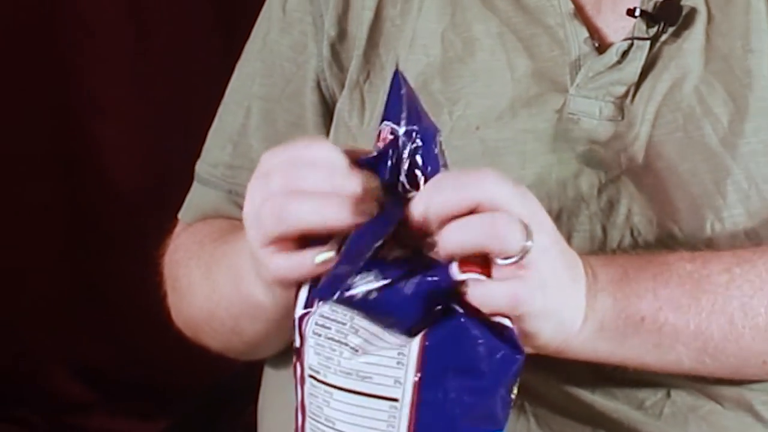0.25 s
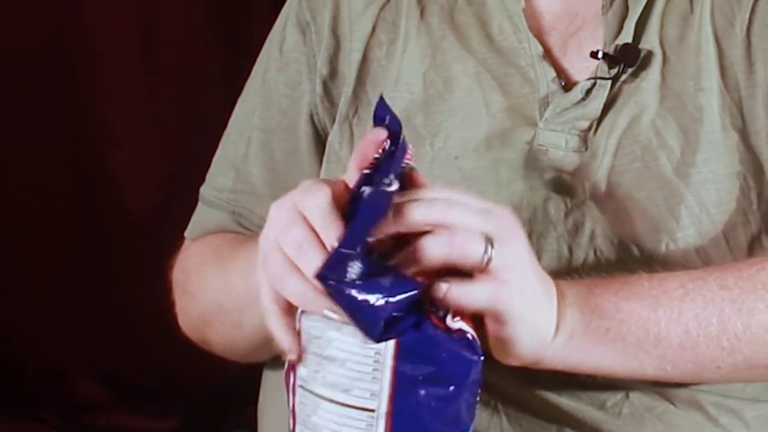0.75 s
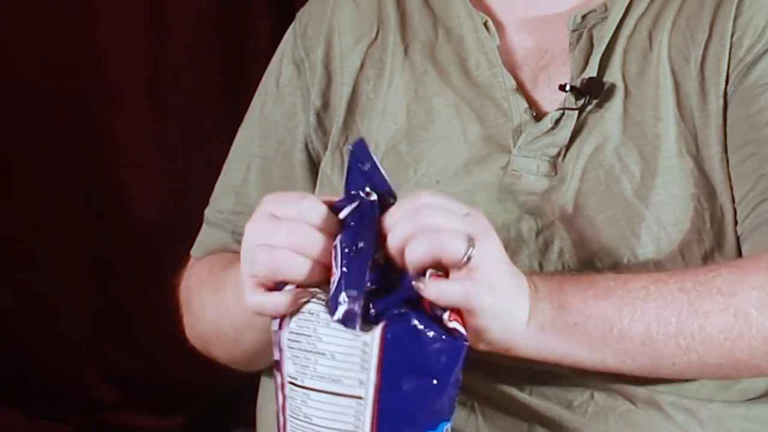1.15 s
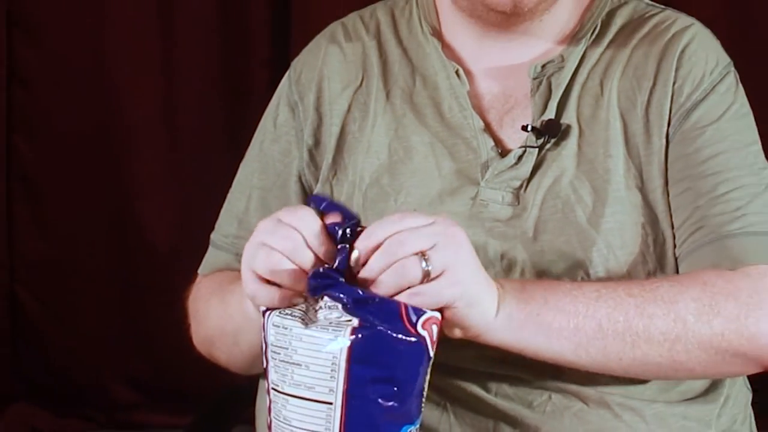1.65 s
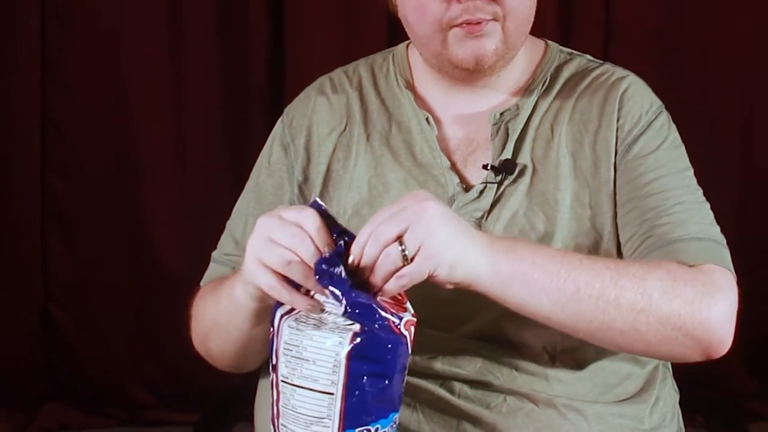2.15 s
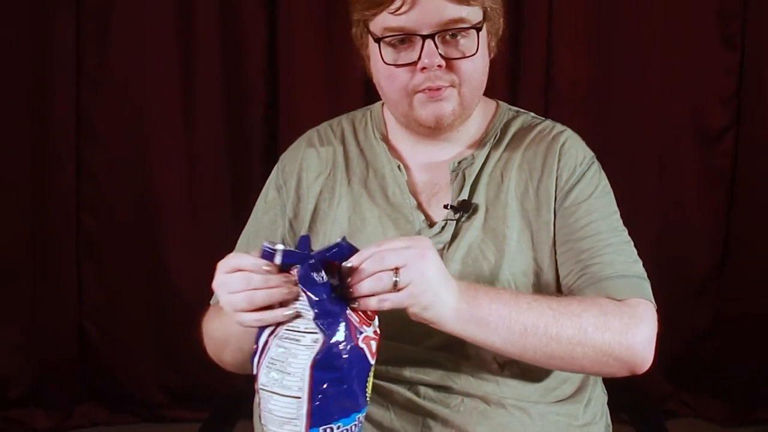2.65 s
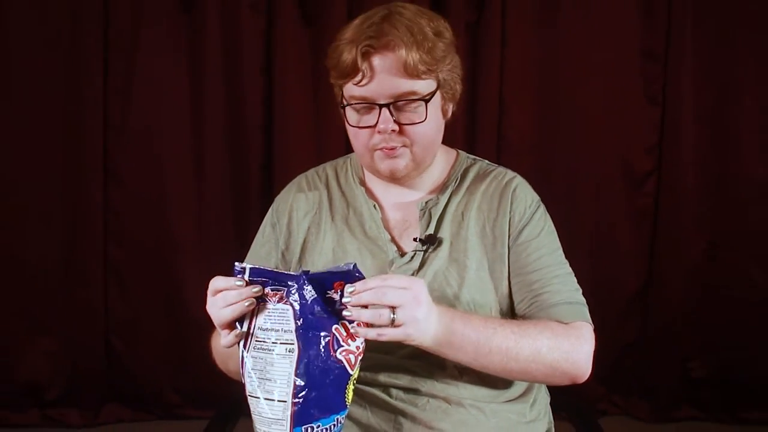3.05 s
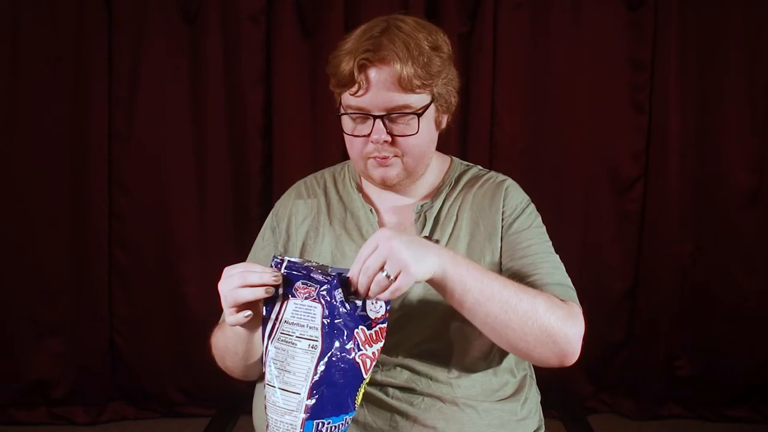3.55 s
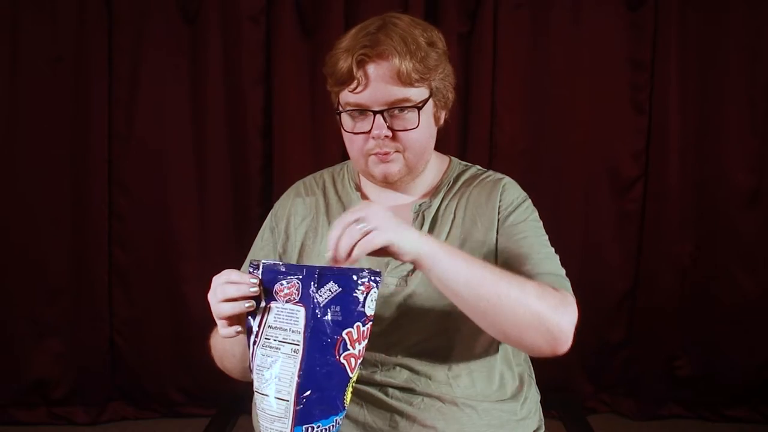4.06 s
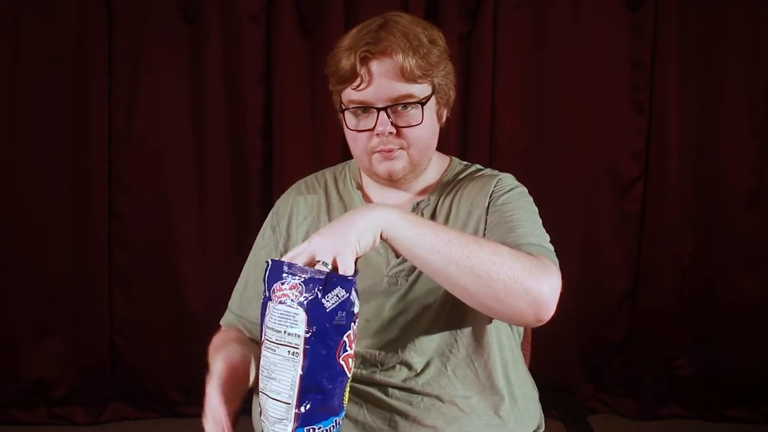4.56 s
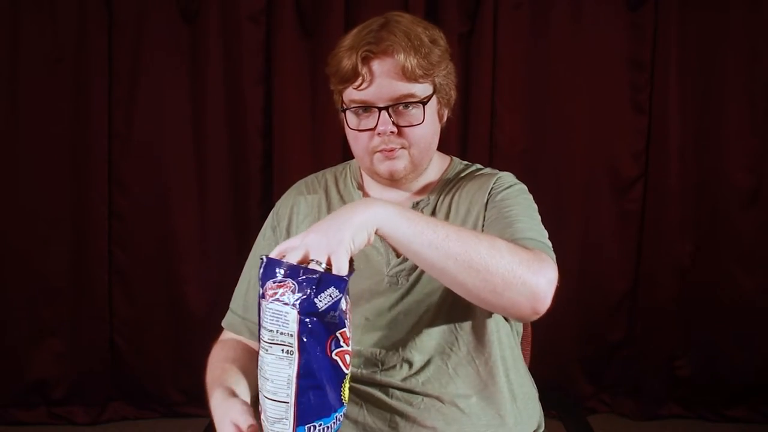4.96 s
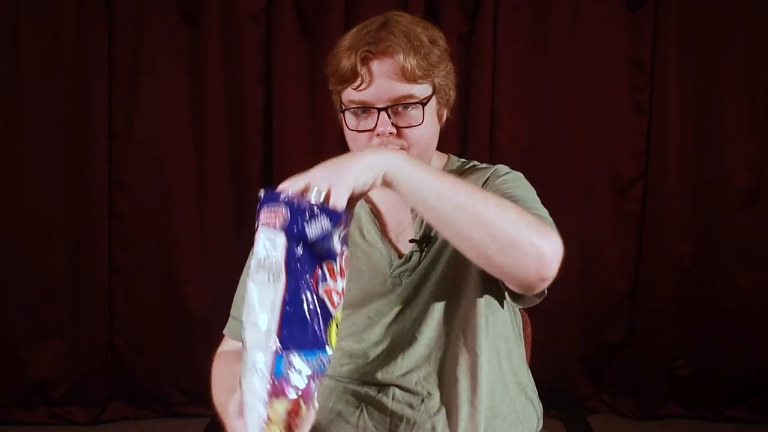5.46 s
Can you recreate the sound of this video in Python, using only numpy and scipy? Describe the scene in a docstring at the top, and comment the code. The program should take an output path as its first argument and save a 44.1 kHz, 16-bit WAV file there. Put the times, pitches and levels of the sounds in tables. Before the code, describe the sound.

Fingers work at a sealed foil snack bag, close to a clip-on microphone in a small curtained room. Dense bright crackle, sharp snaps and small hollow pops run for about three seconds, with two very brief seam zips. It thins to near quiet, crinkles briefly, then bursts crisply as a hand reaches in, ending in faint rustles.

```python
"""A small, curtained room, with a clip-on microphone close to hands that work a foil snack bag open.
Creases snap as ringing film modes over a fine crackle of many small buckles; folds roll as gliding notes.
Whole panels flip with a hollow pop, and the glued seam peels in two quick zips of tiny slips.
Then a hand reaches into the open bag, sliding as soft hiss, rustles it and lifts it, over a faint hush."""
import sys
import numpy as np
from scipy import signal
from scipy.io import wavfile
from scipy.ndimage import uniform_filter1d

SR = 44100
rng = np.random.default_rng(int(sys.argv[2]) if len(sys.argv) > 2 else 0)


def wav_record(signal):
    """Record a signal, one row per channel, as 16-bit PCM in the file named by sys.argv[1]."""
    frames = np.transpose(np.atleast_2d(signal))
    bounded = np.clip(frames, -1, 1)
    # unit amplitude maps onto the largest positive 16-bit level
    quanta = np.round(bounded * 32767).astype(np.int16)
    wavfile.write(sys.argv[1], SR, quanta)


N = 251243
TIME = np.arange(N) / SR  # seconds
EDGE_HZ = 16050  # top of the recorded band

# colour of the bag, as a relative spectrum: frequency_hz, density_db (per Hz)
BAG = [(40, -10), (176, -4.5), (520, -4), (900, -5.5), (1240, -10), (1950, 0.5), (2900, -9), (4500, -14.5),
       (5700, -6.5), (8340, -8.5), (13800, -14.5), (16000, -12.5)]


def snaps(rise=1.0, slip_db=-16, slip_s=0.003, late_s=0.0008, count=3):
    """Each crease buckles and rings its own facet, the broader the drier, amid weaker slips of other facets."""
    # creases that snap through: start_s, energy_db (over one millisecond), pitch_hz,
    # spread_octaves (facet() takes at least 0.2)
    creases = [(0.0665, -24, 2700, 1.1), (0.136, -25, 3720, 0.54), (0.1625, -19.5, 5960, 1.4),
               (0.2019, -17, 2730, 1.66), (0.2248, -18, 2840, 0.31), (0.237, -30, 4600, 0.9),
               (0.3073, -21, 3270, 1.85), (0.4117, -31, 4300, 1.2), (0.438, -25, 1860, 0.28),
               (0.5264, -31.5, 3600, 0.94), (0.5665, -29, 2850, 0.54), (0.599, -24.5, 8140, 0.62),
               (0.614, -22.5, 6550, 1.16), (0.679, -28, 2010, 0.32), (0.739, -28, 5600, 1.4),
               (0.7572, -23, 7100, 1.5), (0.794, -22.5, 5500, 1.15), (0.821, -32, 5850, 0.87),
               (0.8564, -20.5, 7700, 0.53), (0.881, -21, 6200, 0.67), (0.8978, -16, 5600, 1.03),
               (0.987, -24.5, 7900, 0.75), (1.0906, -24, 4350, 1.76), (1.108, -25, 2100, 0.34),
               (1.1164, -22.5, 2170, 0.18), (1.1325, -24, 3800, 0.8), (1.1585, -25.5, 4200, 1.5),
               (1.2008, -26.5, 8700, 0.43), (1.2087, -25.5, 9100, 0.45), (1.225, -25.5, 4560, 1.34),
               (1.238, -21.5, 6550, 1.1), (1.2545, -25.5, 5300, 0.54), (1.288, -26, 4140, 0.36),
               (1.357, -23.5, 3480, 1.05), (1.374, -32, 4120, 1.7), (1.462, -28, 3150, 0.28),
               (1.5022, -30, 2740, 0.79), (1.5198, -28.5, 8300, 0.73), (1.5494, -24, 2210, 0.87),
               (1.6216, -36, 6400, 1.3), (1.6581, -21, 6400, 1.02), (1.666, -23, 5800, 0.75),
               (1.6708, -21.5, 2380, 0.89), (1.7255, -35, 3400, 0.89), (1.847, -25, 6400, 1.1),
               (1.8828, -27.5, 5440, 1.2), (1.8892, -37, 5630, 1.1), (1.945, -25, 6600, 1.4),
               (1.951, -24, 7500, 0.67), (1.9547, -20, 2100, 1.2), (1.9619, -28, 9000, 0.83),
               (1.9658, -22, 9300, 0.66), (2.0674, -18.5, 6170, .12), (2.092, -26.5, 1760, 0.47),
               (2.114, -29, 2840, 0.76), (2.181, -32, 3880, 1), (2.243, -26.5, 2160, 0.92),
               (2.2679, -23.5, 1850, .15), (2.2859, -32.5, 2330, 0.41), (2.3388, -24.5, 2450, 0.82),
               (2.3849, -26, 1950, 0.45), (2.4484, -14, 8360, 0.44), (2.4702, -23, 6700, 0.46),
               (2.4775, -21, 7140, 0.18), (2.483, -24, 3230, 0.21), (2.49, -24, 5040, 0.81),
               (2.5243, -25, 3000, 1.2), (2.5402, -27.5, 5750, 0.8), (2.556, -21.5, 2200, 0.25),
               (2.5694, -12, 2880, 1.14), (2.618, -22.5, 6300, 1.2), (2.662, -32, 4170, 2.5),
               (2.745, -34, 2310, 0.39), (2.758, -23.5, 1780, 0.21), (2.813, -36, 3470, 0.87),
               (2.8765, -21, 9900, 0.19), (2.9001, -17, 9800, 0.41), (2.9181, -20, 7440, 1.7),
               (2.9593, -27, 5000, 0.69), (3.013, -27, 7540, 1.35), (3.152, -39, 8600, 0.64),
               (3.201, -42, 2380, 1), (3.3378, -38.5, 4800, 0.55), (3.603, -52, 2600, 1.1),
               (3.6538, -36, 7060, 0.2), (3.6605, -34, 7160, 0.22), (3.6865, -29.5, 5400, 1.33),
               (3.7835, -17.5, 2500, 0.88), (3.816, -27, 2180, 0.34), (3.861, -33, 1950, 0.29),
               (3.8863, -22, 2000, 1.01), (3.892, -26.5, 1480, 1.07), (3.9889, -29.5, 5170, 0.32),
               (4.016, -42, 4660, 0.34), (4.135, -45.5, 3040, 0.77), (4.38, -36.5, 3100, 0.35),
               (4.398, -23, 5600, 0.64), (4.4086, -29.5, 5600, 0.36), (4.4438, -28, 5100, 0.91),
               (4.4605, -13, 7800, 0.41), (4.4753, -10.5, 7150, 0.48), (4.479, -20, 7000, 0.6),
               (4.5353, -25.5, 6600, 0.4), (4.5604, -27, 2410, 0.17), (4.5809, -23.5, 6500, 0.64),
               (4.6139, -22.5, 5800, 0.42), (4.618, -22, 3840, 0.62), (4.6467, -22, 4960, 0.75),
               (4.6763, -29.5, 4650, 0.54), (4.7, -29.5, 2280, 0.9), (4.816, -32, 3080, 0.68),
               (4.825, -27, 4640, 1.07), (4.8742, -31.5, 2550, 1.83), (4.9245, -35, 6500, 1),
               (4.9443, -28.5, 3350, 1.48), (5.1644, -37, 4450, 0.26), (5.3017, -44.5, 3570, 0.16),
               (5.3745, -29.5, 3350, 0.77), (5.404, -34.5, 2500, 0.49), (5.501, -32, 2000, 1),
               (5.5564, -30, 4900, 0.56), (5.648, -42, 2560, 1.13)]
    t60, linger_db = 0.0105, -26  # t60 in s, before the spread shortens it
    out = np.zeros(N)
    for s, db, hz, octaves in creases:
        ring = facet(hz, octaves, t60 / (1 + octaves / 2), rise, linger_db, crack_db=-13.5)
        add(out, s, amp(db) * rebound(ring, edge=0.37))
        # slips fall just before and after the snap
        for when, detune in rng.uniform(-0.65, 1, (count, 2)):
            slip = facet(hz * 2 ** (detune / 2), octaves, t60, rise, count=12, size=400)
            add(out, s + late_s + slip_s * when, amp(db + slip_db) * slip)
    return out


def facet(hz, octaves, t60, rise, linger_db=-19, crack_db=-12, count=30, size=2400):
    """A patch of film cracks and rings in short modes about its pitch; t60 (s) is at 1 kHz, higher is shorter."""
    t = np.arange(size) / SR
    place, phase = rng.random((2, count, 1))
    octaves = max(octaves, 0.2)
    # one mode at a random place in each equal step of pitch
    low = np.log2(hz) - 2 * octaves
    high = min(np.log2(hz) + 2 * octaves, np.log2(EDGE_HZ))
    f = 2 ** (low + (high - low) * (np.arange(count)[:, None] + place) / count)
    life = t60 * (f / 1000) ** -0.62
    nearness = np.exp(-0.72 * abs(np.log2(f / hz)) / octaves)
    weight = nearness * np.sqrt(amp(read(BAG, f)) * np.sqrt(f))
    fall = np.exp(-np.log(1000) * t / life)
    fall = fall + amp(linger_db) * np.sqrt(np.sqrt(fall))  # the rest of the bag rings on, weaker and longer
    swell = 1 - np.exp(-t * f / rise)  # rise in cycles of each mode
    modes = weight / np.sqrt(life) * swell * fall * np.sin(2 * np.pi * (f * t + phase))
    ring = modes.sum(0) * (1 - t / t[-1])
    # the first few cycles are rough and wide in pitch
    cycles = t * hz
    double_pole = np.poly([np.exp(-2 * np.pi * hz / SR)] * 2)
    rough = signal.lfilter([1, -1], double_pole, rng.standard_normal(size))
    crack = rough * cycles * np.exp(-cycles)
    return one_ms(unit(ring) + amp(crack_db) * unit(crack))


def rebound(ring, edge=0.56, shortest_s=0.00027, longest_s=0.0006):
    """The wave comes back from the edge of the facet and carves the ring into a few separate peaks."""
    trip, side = rng.random(2)
    lag = max(round((shortest_s + (longest_s - shortest_s) * trip) * SR), 1)
    returned = np.r_[np.zeros(lag), ring[:-lag]]
    both = ring + np.sign(side - 0.5) * edge * returned
    return both * np.linalg.norm(ring) / np.linalg.norm(both)  # same energy as before


def crackle(crinkle_gain_db=1.92, fizz_gain_db=-2.5, keen_db=-43, keen_slope=0.19):
    """The buckles sound in the film as crinkle and fizz, and in the pouch as a hollow rumple and bass."""
    # the mouth of the bag comes apart: first and last time, in s
    opening_s = (1.95, 2.3)
    crinkle_db, fizz_db, hollow_db, bass_db = hands()
    film, pushes = buckles(crinkle_db)
    bag = folding(coloured(film + 0.4 * pushes, BAG))
    crinkle = played(band(bag, 1143, 4350), crinkle_db + crinkle_gain_db)
    # hard handling is keen, gentle handling loses its top
    keen = amp(np.clip(keen_slope * (fizz_db - keen_db), -20, 2))
    treble = band(bag, 4700, 14000)
    dull = signal.convolve(treble, signal.firwin(15, 8500, fs=SR), "same")
    fizz = played(dull + keen * (treble - dull), fizz_db + fizz_gain_db)
    hollow = played(band(bag, 271, 1365), hollow_db)
    # the sealed pouch is stiff; once open it goes slack and sounds deeper
    air = folding(coloured(pushes, BAG))
    slack = np.interp(TIME, opening_s, (0, 1))
    stiff_air, slack_air = band(air, 94.5, 284), band(air, 35, 201)
    bass = played((1 - slack) * stiff_air + slack * slack_air, bass_db)
    return crinkle + fizz + hollow + bass


def hands(size=64):
    """Levels in dB of crinkle, fizz, hollow and bass: the power of all squeezes adds to the stir of the held bag."""
    # each squeeze, pull or shove: start_s, length_s (held), crinkle_db,
    # then relative to the crinkle: fizz_db, hollow_db (sound of the pouch), bass_db.
    # First the fingers work in beside the seam; from 1.8 s they pull it open; from 3 s they spread
    # the mouth; from 4.4 s a hand reaches in and lifts. crackle() trims crinkle and fizz afterwards
    squeezes = [ (0.0, 0.0035, -40, 0, -0.5, -8), (0.064, 0.025, -34.5, 0.5, -2.5, -13.5),
                (0.144, 0.064, -32.5, -1.5, 0.5, -18), (0.247, .14, -40, 1.5, -6, -20.5),
                (0.41, 0.088, -41, -2.5, -5, -9.5), (0.546, 0.091, -40, -3.5, -0.5, -9),
                (0.664, 0.14, -49.5, -2, -7, -21), (0.751, 0.054, -36, 3, -1.5, -3.5),
                (0.836, 0.09, -38.5, 4, 0, -2.5), (0.958, 0.22, -40, -1, -0.5, -21.5),
                (1.212, 0.07, -39.5, 0, 0, -20), (1.3, 0.11, -43, -3.5, -5, -17),
                (1.445, 0.078, -40.5, -2, -5, -11.5), (1.537, 0.018, -40.5, -0.5, 0.5, 1.5),
                (1.639, 0.083, -39.5, 1, -3.5, -11.5), (1.74, 0.12, -52, -15, -4, -19),
                (1.836, 0.099, -48, 6.5, -1, -8.5), (1.947, 0.12, -45.5, 1.5, -2.5, -11.5),
                (2.1, 0.015, -47.5, 1, 1, -5), (2.181, 0.11, -44, -5, -2, -5),
                (2.325, 0.08, -50.5, -3.5, -0.5, -8), (2.464, 0.16, -38.5, 0.5, -3, -8.5),
                (2.661, 0.17, -46, -4.5, 1.5, -8.5), (2.883, 0.073, -41.5, 2.5, 1.5, -11),
                (3.015, 0.018, -55, -17, 3, -10), (3.179, 0.013, -54, -4, 1, -5),
                (3.246, 0.065, -51.5, -4, -1.5, -9.5), (3.588, 0.075, -61.5, -7, 1.5, -10),
                (3.691, 0.033, -43.5, -2.5, -2.5, -10), (3.747, 0.044, -40.5, 3.5, -0.5, -9.5),
                (3.855, 0.1, -46.5, -9.5, -3, -10.5), (4.414, 0.12, -37.5, -1.5, 3, -8.5),
                (4.54, 0.13, -42.5, -7, 2, -3.5), (4.827, 0.0084, -45, -6, 7.5, -5),
                (4.945, 0.0091, -45.5, -6.5, -3, -5.5), (5.134, 0.03, -55, -10, 0.5, -12),
                (5.264, 0.023, -57.5, -4, 5, -11), (5.403, 0.051, -56, -11, -0.5, 0),
                (5.494, 0.092, -52.5, 3, 4.5, -5.5), (5.616, 0.01, -58, 0, -9, -20)]
    # the bag merely held: crinkle_db, fizz_db, hollow_db, bass_db
    held_db = (-72, -73, -70, -76)
    # bent film creeping back, level against the squeeze: crinkle_db, fizz_db, hollow_db, bass_db
    creep_db = (-5.5, -8, -4.5, -8)
    # loss of the creep, in dB per second: crinkle, fizz, hollow, bass
    creep_fade = (128, 114, 115.4, 118)
    build_db_per_s, let_go_db_per_s = 677, 356.5
    t = TIME[::size, None]
    power = amp(held_db) ** 2
    for start, length, db, *colour_db in squeezes:
        before = np.maximum(start - t, 0)
        after = np.maximum(t - start - length, 0)
        # the squeeze lets go, then the film creeps back, softer and for longer
        release_db = np.maximum(-let_go_db_per_s * after, creep_db - after * creep_fade)
        power = power + amp(db + np.r_[0, colour_db] - build_db_per_s * before + release_db) ** 2
    return [np.interp(TIME, t.ravel(), 10 * np.log10(p)) for p in power.T]


def buckles(crinkle_db, t60=0.0098, rub_db=-31, lead_db=-16, lead_s=0.0022, count=140):
    """Countless small buckles, most faint and a few strong; each rings one of many facets, some keen, some broad."""
    per_s, busiest_db = 1900, -36  # chances per second, and the effort at which all of them are taken
    spread_db, most = 5.6, 3.3  # exponential spread of strength, cut off at this many spreads
    pitches = np.geomspace(260, 13000, count)
    rings = []
    for hz, octaves in zip(pitches, rng.uniform(0.3, 1.4, count)):
        ring = facet(hz, octaves, t60, 0.095, count=14, size=1200)
        rings.append(rebound(ring) * np.sqrt(hz))
    when, size, which, sign, chance = rng.random((int(per_s * N / SR), 5)).T
    at = (when * N).astype(int)
    happens = chance < amp(crinkle_db[at] - busiest_db) ** 0.3  # gentle hands make fewer buckles
    strength = happens * amp(spread_db * np.minimum(-np.log(1 - size), most)) * np.sign(sign - 0.5)
    film, pushes = np.zeros((2, N))
    facets, leads = (which * count).astype(int), rng.random(len(when))
    for s, a, k, lead in zip(when * N / SR, strength, facets, leads):
        add(film, s - lead * lead_s, amp(lead_db) * a * rings[k - 1])  # a neighbouring facet gives way first
        add(film, s, a * rings[k])
    pushes[at] = strength  # every buckle also shoves the air in the pouch
    rub = amp(rub_db) * rng.standard_normal(N)
    return unit(film) + rub, unit(pushes)


def folding(x, size=512):
    """The folds keep changing shape: resonances come and go in patches of some 30 ms and half an octave."""
    patchy_db, even_above_hz, wander_octaves = 3.6, 6500, 0.27
    hz, _, z = signal.stft(x, nperseg=size, noverlap=size * 3 // 4, fs=SR)
    # random patches of level, laid out in tenths of an octave (wider in the bass)
    tenths = (10 * np.log2(1 + hz / 150)).astype(int)
    field = rng.standard_normal((tenths[-1] + 1, z.shape[1]))
    field = uniform_filter1d(field, 7, axis=1)
    field = unit(uniform_filter1d(field, 5, axis=0))
    patches = uniform_filter1d(field[tenths], size=3, axis=0)
    depth_db = patchy_db / (1 + (hz[:, None] / even_above_hz) ** 2)  # treble modes crowd together and even out
    # tension retunes the whole bag
    tension = unit(uniform_filter1d(rng.standard_normal(z.shape[1]), size=24))
    stretch = 2 ** (wander_octaves * tension)
    retuned_db = read(BAG, hz[:, None] * stretch) - read(BAG, hz[:, None])
    z = z * amp(retuned_db + depth_db * patches)
    return signal.istft(z, nperseg=size, noverlap=size * 3 // 4)[1][:N]


def played(x, db, size=1900):
    """Gives a crackle the slow level that the hands set, leaving its grain alone."""
    power = uniform_filter1d(uniform_filter1d(x ** 2, size), size)
    return x / np.sqrt(abs(power) + 1e-14) * amp(db)


def pops(swell_cycles=0.46, film_db=-11, octaves=0.6, t60=0.017, rise=0.24):
    """A large panel flips and swings briefly: a compact thump of air, with a weaker ring of the film about it."""
    # panels that flip and push the air in the pouch: start_s, energy_db (over one millisecond), pitch_hz
    panels = [(0.066, -29, 693), (0.135, -26, 503), (0.201, -16.5, 510), (0.767, -24, 327),
              (0.775, -19, 208), (0.782, -19.5, 295), (0.899, -27.5, 350), (1.2238, -18.5, 534),
              (1.3325, -28.5, 525), (1.5332, -18.5, 530), (1.5358, -22, 208), (1.882, -28.5, 870),
              (1.9525, -21, 351), (2.243, -24.5, 244), (2.386, -32, 173), (2.756, -30, 710),
              (3.771, -33, 53.4), (3.784, -26, 520), (3.885, -29.5, 940), (3.8905, -28, 566),
              (4.211, -47, 884), (4.423, -25, 392), (4.447, -24, 594), (4.823, -32, 477), (4.827, -34, 137),
              (4.988, -32.5, 863), (5.261, -41.5, 900), (5.402, -34.5, 371), (5.406, -37, 91),
              (5.649, -39, 860)]
    out = np.zeros(N)
    for s, db, hz in panels:
        ring = facet(hz, octaves, t60, rise)
        cycles = hz * np.arange(len(ring)) / SR
        lag = 2 * np.arctan(2 * np.pi * swell_cycles)  # it draws back as much air as it pushes
        thump = one_ms(cycles * np.exp(-cycles / swell_cycles) * np.sin(2 * np.pi * cycles - lag))
        add(out, s, amp(db) * one_ms(thump + amp(film_db) * ring))
    return out


def peels():
    """The glue sticks and slips in a train of tiny, uneven slips that ring one taut patch, a little differently."""
    # two pulls on the seam: pitch_hz, spread_octaves, t60_s (at 1 kHz),
    # curve of (time_s, rate in slips per second, level_db of the steady part of a slip)
    pulls = [(13000, .4, .005, [(1.317, 600, -39), (1.328, 230, -39), (1.338, 340, -30),
             (1.346, 450, -35)]), (10500, .8, .009, [(1.983, 390, -28), (1.996, 330, -31), (2.001, 40, -31),
             (2.007, 210, -29), (2.015, 450, -31), (2.024, 800, -31), (2.035, 1000, -39)])]
    rise, uneven_db = 4, 1.5  # cycles; random spread of the slips
    out = np.zeros(N)
    for hz, octaves, t60, curve in pulls:
        s, rate, db = np.transpose(curve)
        t = np.arange(s[0], s[-1], 1 / SR)
        # a slip falls wherever the running count passes a whole number
        slip_count = np.floor(np.cumsum(np.interp(t, s, rate)) / SR)
        slips = t[np.diff(slip_count, prepend=-1) > 0]
        taut = facet(hz, octaves, t60, rise)
        for at in slips:
            level = amp(np.interp(at, s, db) + uneven_db * rng.standard_normal())
            add(out, at, level * (taut + facet(hz, octaves, t60, rise) / 2))
    return out


def rolls(width_hz=70):
    """Folds roll along and rub one gliding resonance out of the pouch, which swells and fades."""
    # rolling folds: start_s, length_s, first_hz, last_hz, level_db (rms before the swell and fade)
    folds = [(0.405, 0.098, 312, 165, -38.5), (0.848, 0.05, 778, 860, -38), (1.229, 0.054, 558, 513, -35.5)]
    r, out = np.exp(-np.pi * width_hz / SR), np.zeros(N)
    for s, length, first_hz, last_hz, db in folds:
        size = round(length * SR)
        noise = [1, 1j] @ rng.standard_normal((2, SR))
        waver = signal.lfilter([1], np.poly([r, r]), noise)[-size:]  # slow noise, taken once settled
        glide = np.cumsum(np.geomspace(first_hz, last_hz, size)) / SR
        note = (waver * np.exp(2j * np.pi * glide)).real
        add(out, s, amp(db) * unit(note) * np.sqrt(np.hanning(size)))
    return out


def slide(length_s=0.17, lo_hz=2200, hi_hz=7200):
    """The back of the hand slides along the foil inside the bag: a soft hiss that swells and fades."""
    # slides of the hand: start_s, level_db (rms before the swell and fade)
    strokes = [(5.09, -62.5), (5.391, -64)]
    size, out = round(length_s * SR), np.zeros(N)
    for s, db in strokes:
        hiss = unit(band(rng.standard_normal(size), lo_hz, hi_hz))
        add(out, s, amp(db) * np.sqrt(np.hanning(size)) * hiss)
    return out


def room(x, near_db=-18, near_t60=0.084, far_db=-23, bass_t60=0.43, treble_t60=0.25, size=16384):
    """Quick reflections off hands and chest, then a faint tail that the curtains soak up."""
    t = np.arange(size) / SR
    # sparse random reflections, about 2500 a second
    near, far = rng.standard_normal((2, size)) * (rng.random((2, size)) < 2500 / SR)
    near = near * (t > 0.0012) * amp(-60 * t / near_t60)
    far = far * (t > 0.007)
    far_bass = band(far, 110, 2000) * amp(-60 * t / bass_t60)
    far_treble = band(far, 4200, 11000) * amp(-60 * t / treble_t60)
    far = far_bass + 0.87 * far_treble
    echo = amp(near_db) * near / np.linalg.norm(near) + amp(far_db) * far / np.linalg.norm(far)
    return x + signal.oaconvolve(x, echo)[:N]


def still_room(level_db=-73.5):
    """The hush of the still room: steady noise shaped by a fixed spectrum."""
    # relative spectrum of the hush: frequency_hz, density_db (per Hz)
    hush = [(30, 10.5), (700, -16.5), (1200, -10.5), (3000, -16), (7900, -10), (16000, -39)]
    return amp(level_db) * unit(coloured(rng.standard_normal(N), hush))


def amp(db):
    """Decibels to gain."""
    return 10 ** (np.asarray(db) / 20)


def unit(x):
    """Scales to rms 1."""
    return x / np.sqrt(np.mean(x ** 2) + 1e-20)


def one_ms(x):
    """Scales a short sound to the energy of one millisecond at rms 1."""
    return x / np.sqrt(np.sum(x ** 2) / (SR / 1000) + 1e-20)


def read(points, hz):
    """Reads a spectrum on a log-frequency axis."""
    f, db = np.transpose(points)
    return np.interp(np.log(hz + 1), np.log(f), db)


def add(mix, s, sound):
    """Mixes a sound in at time s (seconds)."""
    part = mix[max(round(s * SR), 0):][:len(sound)]
    part += sound[:len(part)]


def band(x, lo_hz, hi_hz, order=3):
    """Causal band-pass."""
    edges = [lo_hz, min(hi_hz, 0.49 * SR)]
    return signal.sosfilt(signal.butter(order, edges, "band", fs=SR, output="sos"), x)


def coloured(x, spectrum, size=4096):
    """Causal minimum-phase filter with the given spectrum, so that clicks keep their sharp fronts."""
    log_gain = np.log(amp(read(spectrum, abs(np.fft.fftfreq(size, 1 / SR)))))
    taps = np.fft.ifft(np.exp(np.conj(signal.hilbert(log_gain)))).real
    return signal.oaconvolve(x, taps[:size // 2])[:N]


def scene():
    """The bag in the room, over a faint hush."""
    bag = snaps() + pops() + peels() + crackle() + rolls() + slide()
    return (room(bag) + still_room())[None]


def record(dry):
    """The microphone's low cut, then the recorder's band limit."""
    dry = signal.sosfilt(signal.butter(3, 36, "high", fs=SR, output="sos"), dry)
    low_pass = signal.firwin(301, EDGE_HZ, window=("kaiser", 9), fs=SR)
    return signal.oaconvolve(dry, low_pass[None], "same")


dry = scene()
out = record(dry)
wav_record(out)
```